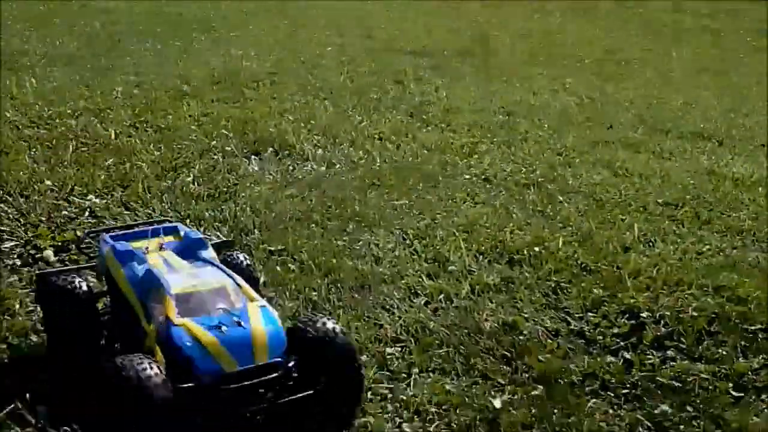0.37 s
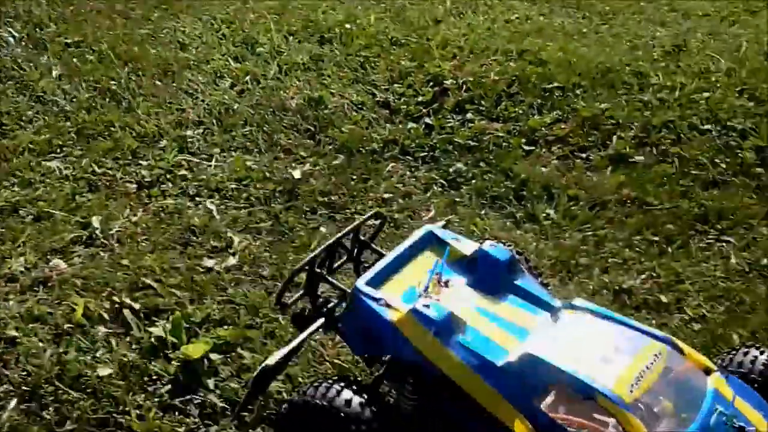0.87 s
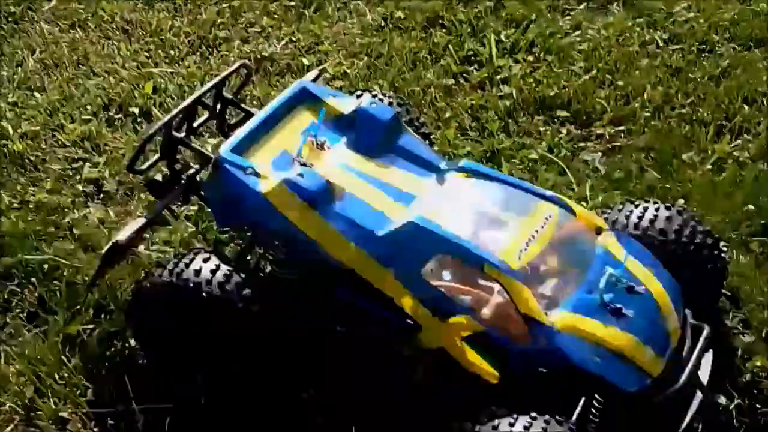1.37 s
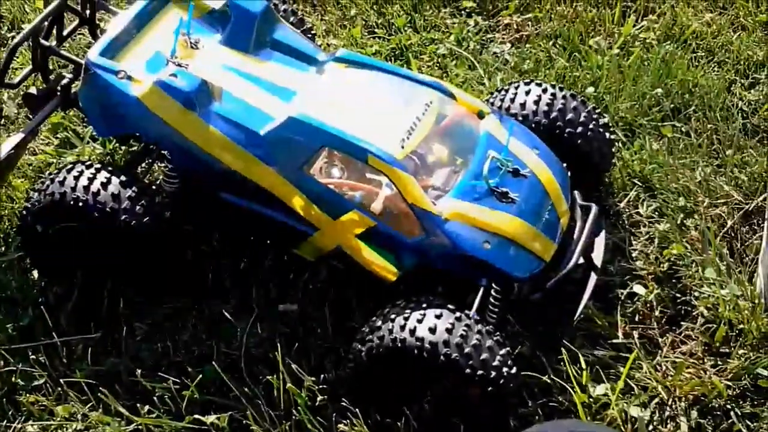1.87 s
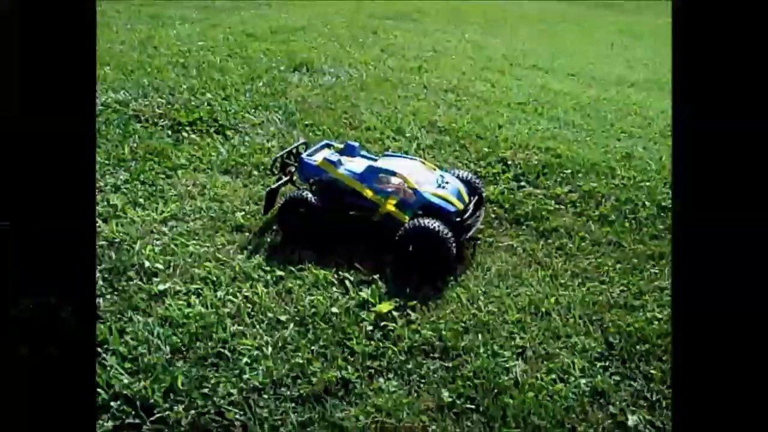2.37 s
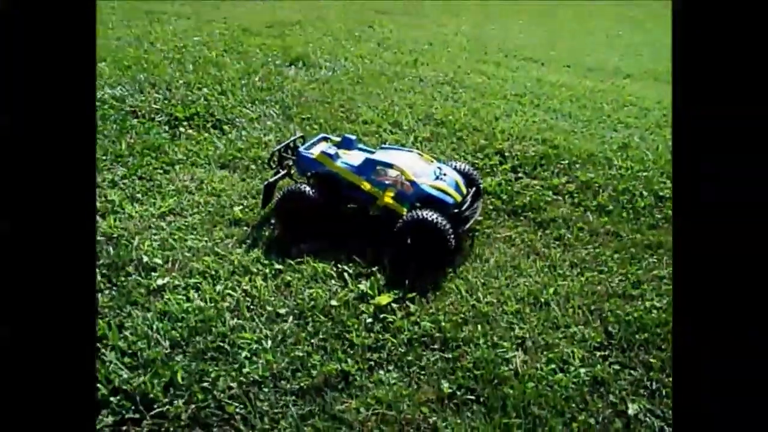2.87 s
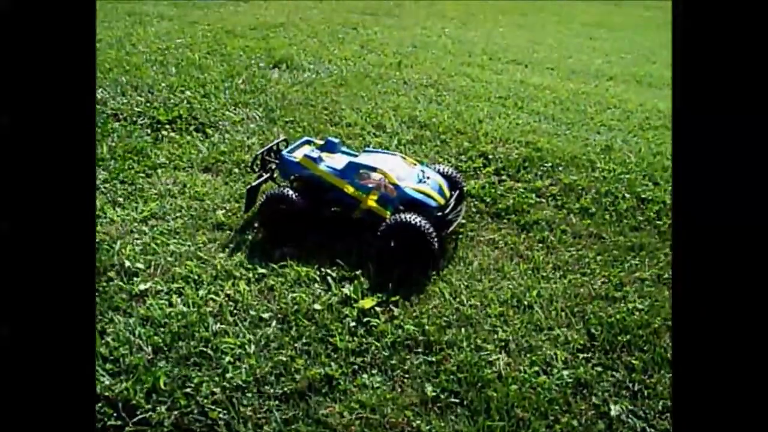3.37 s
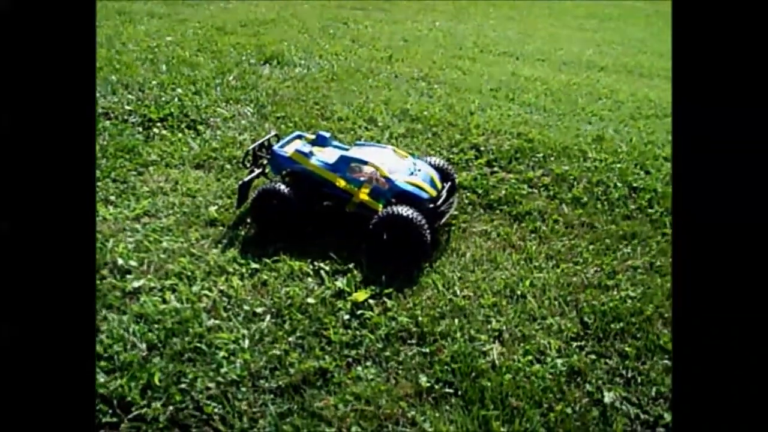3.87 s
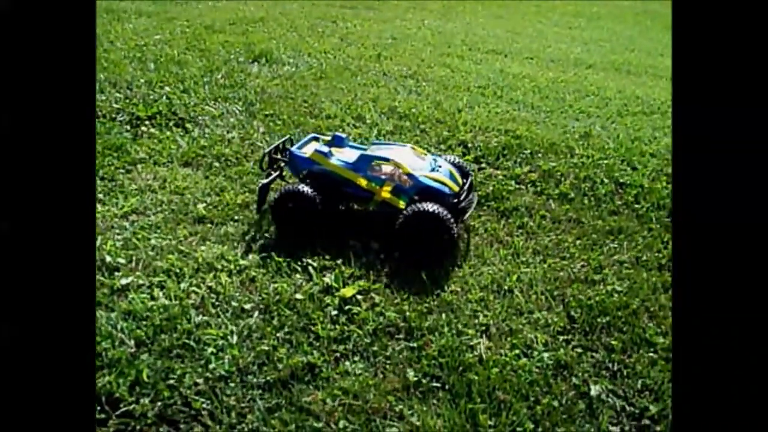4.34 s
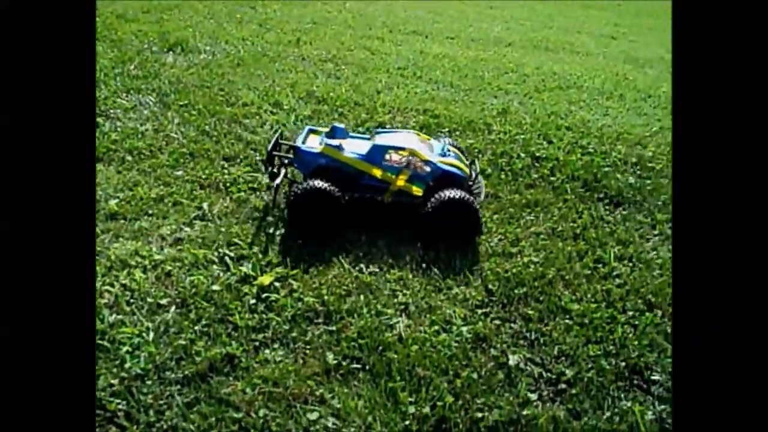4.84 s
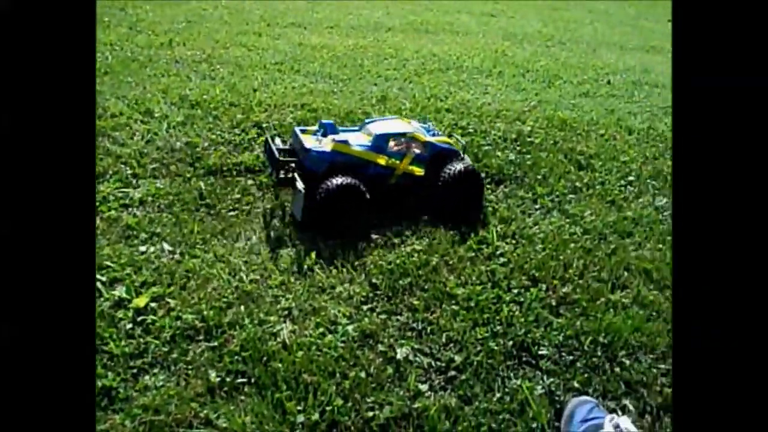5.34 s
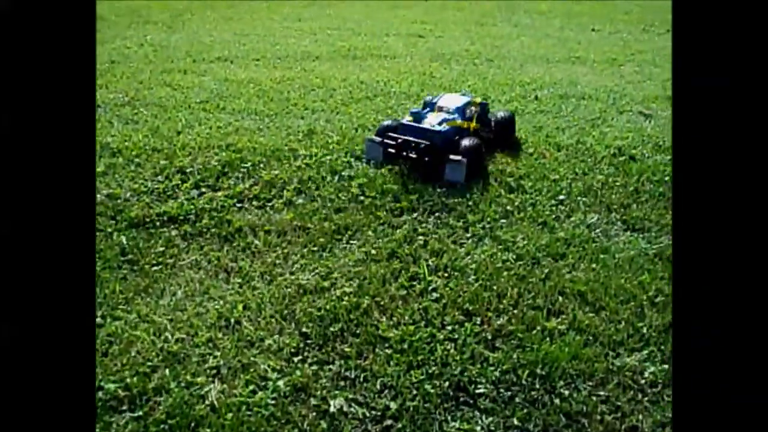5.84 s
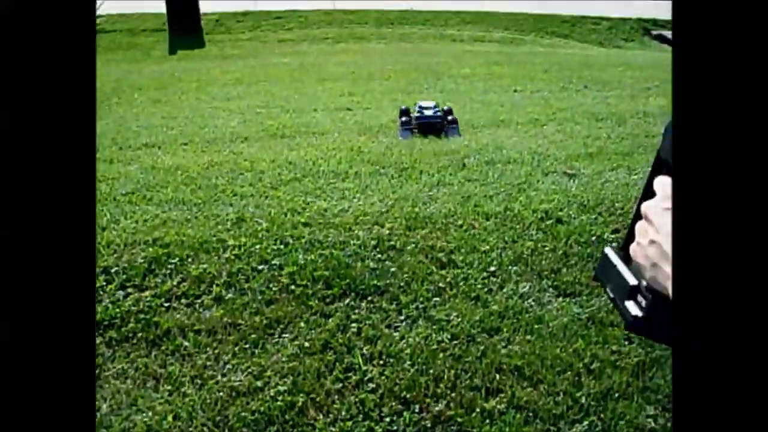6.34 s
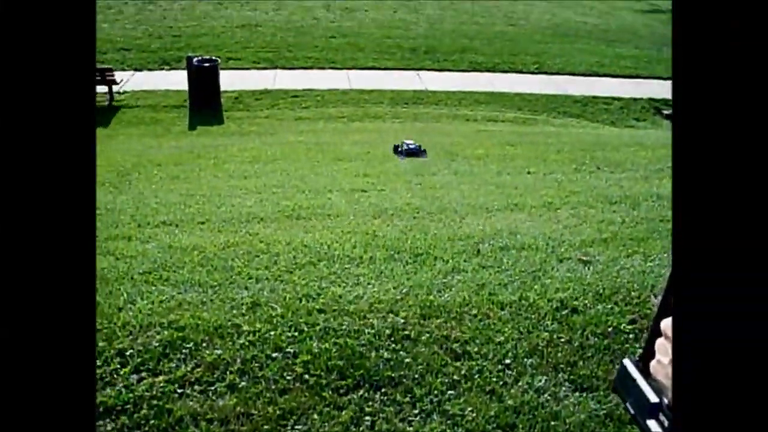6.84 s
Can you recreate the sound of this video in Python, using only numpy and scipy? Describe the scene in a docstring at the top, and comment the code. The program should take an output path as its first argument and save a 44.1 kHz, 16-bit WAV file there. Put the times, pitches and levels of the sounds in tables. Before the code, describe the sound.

Faint air and electronic hum sit under tyres brushing grass and light plastic ticking, fading as the small truck halts near the microphone. Fingers bump the camera and its button snaps. After a tiny silence, a muffled second microphone gives loud hiss and low wind. Irregular hand-held remote clicks and a short scrape come close, a bird chirps, then the electric drive growls away, rising to a harsh, clipped whine amid tyre rush.

```python
"""A radio-controlled truck swishes through grass to a stop beside a camera, its servo whirring at the start,
chassis ticking and electronics humming; then a soft push and a button click on the camera. After a cut, a
duller second camera: loud hiss, wind and a distant machine under plastic clicks of the hand-held remote and
a bird. The truck pulls away, its gear whine climbing until it overloads the input. Shaped noise makes the
air and grass, ringing puffs the clicks, and a gliding tone with smeared overtones the gears."""
import sys
import numpy as np
from scipy import signal
from scipy.io import wavfile
from scipy.ndimage import uniform_filter1d

SR = 44100
rng = np.random.default_rng(int(sys.argv[2]) if len(sys.argv) > 2 else 0)


def persist_wave(psi):
    """Save psi, clipped to +-1, as 16-bit WAV."""
    counts = np.round(np.clip(psi, -1, 1) * 32767).astype(np.int16)
    wavfile.write(sys.argv[1], SR, np.atleast_2d(counts).T)


def field_ratio(decibels):
    """Amplitude ratio for a level in dB (20 dB per decade); scalars and array-likes work."""
    return 10 ** (np.asarray(decibels, dtype=float) / 20)


N = 306936  # samples, just under 7 s
CUT_S = 2.378

# Noise colours, relative since the noise is levelled afterwards: [pitch_hz, level_db per Hz]
FLOOR_COLOUR = [(130, -15), (250, 1.5), (500, -3), (900, -3.5), (1600, -11.5), (2700, -13.5), (4500, -12.5),
                (7500, -16.5), (9500, -25.5), (15500, -43.5), (16500, -70.5)]
GRASS_COLOUR = [(200, -2), (300, -2), (600, 2), (1100, 0), (1600, 7), (2400, -2), (3100, -6.5), (4000, -2),
                (5500, -10), (7000, -8.5), (9000, -19.5), (12000, -25.5), (15500, -26), (16500, -61.5)]
HISS_COLOUR = [(120, -41.5), (200, 1.5), (296, -7.5), (326, -5.5), (445, -8.5), (584, -11), (706, -1),
               (766, -9.5), (890, -7), (1010, -5), (1370, -6.5), (1550, -3), (2180, -5.5), (2860, 1.5),
               (5120, -20), (6660, -63.5), (11300, -120)]
WIND_COLOUR = [(8.8, -29), (15, 8.5), (59, -8), (97, -7.5), (130, -11), (183, -30.5), (228, -19),
               (400, -36), (520, -67.5), (880, -120)]
BREEZE_COLOUR = [(30, -25.5), (60, -2), (120, 13), (250, -6), (400, -28.5)]

# Gusts of air, bell-shaped: [centre_s, level_db, length_s]
BREEZE_PUFFS = [(.4, -53, 0.052), (.56, -57, .04), (.73, -49, 0.066), (.93, -51, 0.071), (1.23, -65, 0.13),
                (1.89, -47, 0.082), (2.16, -52, 0.047)]
WIND_GUSTS = [(2.85, -31.5, 0.05), (3.65, -32, 0.025), (5.35, -31, 0.071), (5.52, -31, .06),
              (5.98, -31, 0.025), (6.27, -32.5, 0.031), (6.45, -33.5, 0.021), (6.8, -29.5, .08)]
# One brief rustle of grass: [centre_s, level_db, length_s]
RUSTLE = (2.28, -46.5, 0.014)
# Short whirrs of the steering servo: [centre_s, level_db, length_s]
SERVO_WHIRRS = [(0, -42, .008), (.02, -41, .009), (.047, -36, 0.011), (.092, -36, 0.0084)]

# A distant machine: [pitch_hz, rms_db, width_hz]
FAR_MACHINE = [(715, -52, 20), (95, -42, 18)]
# Idle noise bands of fan and speed controller: [pitch_hz, rms_db, width_hz]
IDLE_BANDS = [(210.7, -61.5, 6.5), (1170, -77, 78), (3590, -61, 450)]
# Steady switching tones of the electronics: [pitch_hz, rms_db]
SWITCHING_TONES = [(1200, -63.5), (3601, -65.5)]

# Resonances of the servo, chassis, remote's shell and truck body: [pitch_hz, width_hz, gain_db]
SERVO_MODES = [(1150, 180, 2), (3610, 250, -3.5), (6100, 500, -10.5)]
CHASSIS_MODES = [(1055, 130, 0), (1600, 180, -7), (1870, 150, 3), (2716, 310, -3), (3620, 570, -10.5),
                 (6030, 1300, -18)]
SHELL_MODES = [(400, 390, -7), (710, 320, -9.5), (1350, 270, 1.5), (1600, 72, 5.5), (2080, 570, 3),
               (2910, 1300, 4), (3306, 200, 4)]
BODY_MODES = [(620, 64, -20), (1027, 130, 1.5), (1830, 67, -13), (2557, 270, 15), (3140, 100, 0),
              (2970, 340, -9.5), (4160, 63, 0.5), (5640, 250, -37.5)]

# Gliding bird notes: [start_s, length_s, from_hz, to_hz, level_db]
BIRD_NOTES = [(4.733, .014, 3500, 3300, -31), (4.731, .014, 4100, 3900, -33),
              (4.754, .016, 3200, 3600, -28), (4.764, .018, 3800, 4200, -29),
              (4.777, .018, 3450, 3520, -25)]
# Finger on the camera case: [start_s, level_db, pitch_hz]
FINGER_THUMPS = [(2.066, -28.5, 490), (2.136, -27, 290), (2.153, -32, 220)]
# Trigger rubbing on the remote: [from_s, to_s, level_db]
SCRAPE = (3.925, 4.03, -24.5)

# Knocks: [start_s, peak_db, ring_hz, t60_s]
CAMERA_BUTTON = [(2.0645, -34.5, 4970, 0.01), (2.0748, -1.5, 4360, 0.0058)]
REMOTE_CLICKS = [(2.754, -6, 1350, 0.018), (2.769, -3.5, 1610, 0.014), (2.797, 8.5, 2010, 0.026),
                 (2.847, -5.5, 2183, 0.029), (2.853, 14.5, 2255, 0.036), (2.893, -7, 2680, 0.036),
                 (3.123, -11.5, 1350, 0.021), (3.131, -3, 1810, 0.045), (3.143, -12, 1600, 0.049),
                 (3.241, -7.5, 1680, 0.032), (3.256, -0.5, 1404, 0.015), (3.394, -15, 2170, 0.014),
                 (3.408, -14.5, 1620, 0.047), (3.529, -5, 2470, 0.02), (3.868, -8, 2480, 0.021),
                 (3.927, -9.5, 735, 0.039), (4.042, -7.5, 2174, 0.01), (4.063, -17, 2640, 0.016),
                 (4.087, -12, 1310, 0.032), (4.152, -19.5, 2300, 0.033), (4.198, -7.5, 2220, 0.017),
                 (4.256, 2.5, 1600, 0.046), (4.449, -2.5, 2080, 0.016), (4.492, -17.5, 1530, 0.034),
                 (4.975, -6, 2630, 0.02), (5.569, -3.5, 2150, 0.028), (5.613, -12, 2900, 0.01),
                 (5.648, -10, 2460, 0.01)]
CHASSIS_TICKS = [(0.268, -38, 970, 0.04), (0.5153, -22, 2960, 0.04), (0.568, -35, 1130, 0.027),
                 (0.619, -31, 2660, 0.16), (0.9798, -28, 2100, 0.025), (1.0638, -33, 1150, 0.11),
                 (1.0849, -31.5, 2100, 0.12), (1.1069, -33.5, 2150, 0.036), (1.1856, -35, 1200, 0.21),
                 (1.2708, -36, 1100, 0.027), (1.3065, -28, 1220, 0.021), (1.3758, -34.5, 1200, 0.04),
                 (1.3604, -38, 1900, 0.03)]  # steering and chassis plastic

# Tyres rolling in grass: [time_s, swish_db, treble_db]
ROLL = [(0, -57.5, -45.5), (.09, -45, -41.5), (.18, -50, -49.5), (.26, -41.5, -40), (.39, -49, -51.5),
        (.56, -45.5, -50), (.65, -43, -46), (.88, -43.5, -45.5), (.99, -39.5, -43), (1.04, -52.5, -50),
        (1.09, -42.5, -53), (1.17, -46.5, -49.5), (1.31, -53, -57), (1.4, -65, -78.5), (1.6, -75, -77)]
# Gears pulling away, before the body shapes them: [time_s, mesh_hz, load_db]
DRIVE = [(5.29, 191.8, -26), (5.33, 202.9, -24.5), (5.43, 248.8, -23.5), (5.49, 316.4, -22),
         (5.57, 363, -20.5), (5.63, 389.4, -23), (5.75, 538, -16.5), (5.855, 665, -21.5),
         (5.875, 720.2, -19.5), (5.96, 919, -16.5), (6.01, 967.7, -14.5), (6.05, 1154, -13),
         (6.1, 1305, -13.5), (6.18, 1336, -19), (6.21, 1470, -18.5), (6.26, 1584, -12), (6.31, 1830, -9.5),
         (6.35, 1771, -15), (6.4, 1772, -13), (6.43, 1930, -10.5), (6.47, 2480, -15), (6.5, 2579, -8.5),
         (6.6, 2483, -9.5), (6.63, 2535, -9), (6.656, 2340, -24), (6.67, 2498, -3.5), (6.71, 2658, -14),
         (6.77, 2995, -7.5), (6.82, 2997, -9), (6.865, 3080, -10.5), (6.878, 3340, -9.5),
         (6.92, 3430, -7.5), (6.96, 3544, -28)]
# Overtones of the mesh against its load, before the body: [time_s, double_db, triple_db]
OVERTONES = [(5.3, -20, -0.5), (5.45, -8, -7.5), (5.49, 1.5, -16), (5.6, -2, -10), (5.72, -4.5, -14),
             (5.85, -12, -15), (5.88, -5, 3), (5.99, -7.5, -6), (6.04, -1, -24), (6.12, -3, -4),
             (6.19, -4, -6), (6.26, 1, -18), (6.29, -11.5, -7), (6.32, -2.5, -2), (6.37, -15, -3.5),
             (6.43, -0.5, -24.5), (6.48, -22.5, -40.5), (6.66, -11.5, -41.5), (6.72, -32.5, -42)]
# Weaker gear orders, before the body: [multiple of the mesh, level_db]
WEAK_ORDERS = [(1 / 3, -31.5), (2 / 3, -33.5), (4 / 3, -35), (7 / 3, -35.5)]
# How well the body radiates a tone: [pitch_hz, gain_db]
RADIATION = [(400, -40), (500, -25.5), (620, -6.5), (760, -8.5), (870, -12), (980, 2), (1080, -4.5),
             (1200, -10), (1500, -10), (1800, -7), (2150, 1), (2600, 5.5), (3050, -0.5), (3300, -10),
             (3600, -11), (3950, -1.5), (4300, -11.5), (4800, -17.5), (5250, -14.5), (7000, -69)]
# Noise of the pull-away: [time_s, tyre and gear rush_db, gear rasp_db]
RUSH = [(5.28, -47, -54), (5.5, -31.5, -30), (5.75, -28.5, -15), (5.87, -24.5, -13), (5.96, -20, -26),
        (6.3, -17, -29), (6.47, -19, -33), (6.52, -19, -37.5), (6.64, -29, -31), (6.68, -21.5, -29),
        (6.85, -22.5, -34.5), (6.95, -18.5, -31)]
# A wheel slips free and the speed leaps: [centre_s, share of the speed added]
WHEEL_SPINS = [(6.534, .16), (6.558, .16), (6.575, .1)]


def evened(x):
    """Scales to rms 1."""
    return x / np.sqrt(np.mean(x ** 2) + 1e-20)


def curves(rows):
    """Draws each column of a table as a line over every sample."""
    s, *columns = np.transpose(rows)
    return [np.interp(np.arange(N) / SR, s, column) for column in columns]


def wander(per_s):
    """Slow random drift, rms 1."""
    lowpass = signal.butter(2, per_s, fs=SR, output="sos")
    return evened(signal.sosfiltfilt(lowpass, rng.standard_normal(N)))


def noise(colour, patchy_db):
    """Coloured noise whose level drifts in small patches of time and pitch, rms 1."""
    hz, db = np.transpose(colour)
    bins = np.fft.rfftfreq(1024, 1 / SR)
    real, imaginary, patches = rng.standard_normal((N // 256 + 5, 513, 3)).T
    patches = uniform_filter1d(patches, size=12, axis=0)
    patches = evened(uniform_filter1d(patches, size=8, axis=1))
    colour_db = np.interp(np.log(bins + 1), np.log(hz + 1), db, -120, -120)
    spectrum = (real + 1j * imaginary) * field_ratio(colour_db[:, None] + patchy_db * patches)
    return evened(signal.istft(spectrum, nperseg=1024, noverlap=768)[1][:N])


def resonate(x, hz, width):
    """One resonance of peak gain 1."""
    return signal.lfilter(*signal.iirpeak(hz, hz / width, SR), x)


def through(x, modes):
    """A body with several resonances, alternating in sign."""
    return sum((-1) ** k * field_ratio(db) * resonate(x, hz, width) for k, (hz, width, db) in enumerate(modes))


def bands(rows):
    """Narrow bands of steady noise."""
    return sum(field_ratio(db) * evened(resonate(rng.standard_normal(N), hz, width)) for hz, db, width in rows)


def gusts(rows, calm_db):
    """Gain of a calm level with bell-shaped swells on top."""
    t = np.arange(N) / SR
    return field_ratio(calm_db) + sum(field_ratio(db) * np.exp(-((t - s) / length) ** 2) for s, db, length in rows)


def knocks(rows, modes, shell, own_width):
    """Each knock is a dying puff of noise that rings its own spot and the shared shell."""
    out, t = np.zeros(N + 4000), np.arange(4000) / SR
    for (s, db, hz, t60), chance in zip(rows, rng.standard_normal((len(rows), 4000))):
        attack = np.minimum(t / 0.00055, 1)
        puff = chance * field_ratio(-60 * t / max(t60, .001)) * attack
        ring = resonate(puff, hz, own_width * hz) + shell * through(puff, modes)
        out[round(s * SR):][:4000] += field_ratio(db) * ring / abs(ring).max()
    return out[:N]


def limiter(x, ceiling, recover_db_per_s):
    """Gain drops within 2 ms on a loud peak and creeps back, ducking the background."""
    fall = np.arange(N) * recover_db_per_s / SR
    over_db = 20 * np.log10(abs(x) / ceiling + 1e-9)
    held_db = np.maximum(np.maximum.accumulate(over_db + fall) - fall, 0)
    return x / field_ratio(uniform_filter1d(held_db, size=88, origin=43))


def quiet_floor():
    """Steady, faint coloured noise under the first shot."""
    return field_ratio(-55) * noise(FLOOR_COLOUR, patchy_db=1)


def camera_hiss():
    """Loud, steady coloured noise of the second camera."""
    return field_ratio(-33) * noise(HISS_COLOUR, patchy_db=1.5)


def breeze():
    """Moving air: low noise swelling in short puffs with a restless level."""
    gain = gusts(BREEZE_PUFFS, calm_db=-65) * field_ratio(1.6 * wander(25))
    return gain * noise(BREEZE_COLOUR, patchy_db=2.0)


def wind():
    """Low wind noise, steady with gusts and then freshening."""
    steady_db, rise_s, rise_db_per_s = -31.5, 5.62, 5
    calm_db = steady_db + rise_db_per_s * np.maximum(np.arange(N) / SR - rise_s, 0)
    return gusts(WIND_GUSTS, calm_db) * field_ratio(0.33 * wander(7.3)) * noise(WIND_COLOUR, patchy_db=0.5)


def electronics():
    """Fan and speed controller idle as narrow noise bands with pure switching tones."""
    t = np.arange(N) / SR
    tones = sum(np.sqrt(2) * field_ratio(db) * np.sin(2 * np.pi * hz * t) for hz, db in SWITCHING_TONES)
    return bands(IDLE_BANDS) + tones


def bird():
    """Short gliding whistles with rounded starts and ends."""
    out = np.zeros(N)
    for s, length, from_hz, to_hz, db in BIRD_NOTES:
        hz = np.linspace(from_hz, to_hz, round(length * SR))
        whistle = np.hanning(len(hz)) * np.sin(2 * np.pi * np.cumsum(hz) / SR)
        out[round(s * SR):][:len(hz)] += field_ratio(db) * whistle
    return out


def finger_thumps():
    """Soft pushes on the case: about one rounded cycle each."""
    out = np.zeros(N)
    for s, db, hz in FINGER_THUMPS:
        cycle = np.arange(0, 1.5, hz / SR)
        push = np.hanning(len(cycle)) * np.cos(2 * np.pi * (cycle - .75))
        out[round(s * SR):][:len(cycle)] += field_ratio(db) * push
    return out


def camera_button():
    """A button snaps as two very short, broad knocks."""
    return knocks(CAMERA_BUTTON, CHASSIS_MODES, shell=0.33, own_width=0.87)


def trigger_scrape():
    """Stick-slip of plastic on plastic: random impulses ring the remote's shell."""
    t = np.arange(N) / SR
    from_s, to_s, level_db = SCRAPE
    slips = rng.standard_normal(N) * (rng.random(N) < 2500 / SR)  # about 2500 a second
    fade = np.clip(np.minimum(t - from_s, to_s - t) / .008, 0, 1)
    ringing = evened(through(slips, SHELL_MODES) + 2.7 * resonate(slips, hz=740, width=200))
    return field_ratio(level_db + 2.5 * wander(60)) * fade * ringing


def remote_clicks():
    """Plastic clicks of the remote, each ringing its own pitch and the shell."""
    return knocks(REMOTE_CLICKS, SHELL_MODES, shell=0.24, own_width=0.085)


def steering_servo():
    """The servo whirrs in short swells of resonant noise."""
    whirr = evened(through(rng.standard_normal(N), SERVO_MODES))
    return gusts(SERVO_WHIRRS, calm_db=-120) * whirr


def chassis_ticks():
    """Plastic ticks ring their own spot and the chassis."""
    return knocks(CHASSIS_TICKS, CHASSIS_MODES, shell=0.36, own_width=0.1)


def chassis_rattle():
    """Small random taps, about 100 a second, ring the chassis; rms 1."""
    taps = rng.uniform(-1, 1, N) * (rng.random(N) < 100 / SR)
    puff = rng.standard_normal(600) * field_ratio(-60 * np.arange(600) / SR / .03)  # t60 30 ms
    return evened(through(signal.oaconvolve(taps, puff)[:N], CHASSIS_MODES))


def grass():
    """Tyres brush the blades: fluttering noise in three bands, with rattle and a brief rustle."""
    blades = noise(GRASS_COLOUR, patchy_db=1) * field_ratio(2.5 * wander(300))  # fast flutter roughens it
    blades = blades + 0.17 * evened(through(blades, CHASSIS_MODES))  # the chassis colours the swish

    def band(edge_hz, kind):
        return evened(signal.sosfilt(signal.butter(2, edge_hz, kind, fs=SR, output="sos"), blades))

    low, middle, high = band(2100, "low"), band((2100, 4300), "band"), band(4300, "high")
    swish_db, treble_db = curves(ROLL)
    middle_gain = field_ratio(-4 + 1 * wander(6.1))
    rolling = field_ratio(swish_db) * (low + middle_gain * middle + field_ratio(-8) * chassis_rattle())
    rustle = gusts([RUSTLE], calm_db=-120) * high
    return rolling + field_ratio(treble_db) * high + rustle


def gear_mesh(hz, load_db, turns):
    """Meshing teeth sing a tone and two overtones, loud where they cross a body resonance."""
    speed = np.clip(hz / 900, .55, 1)  # slow gears run smoother
    tone = 0
    smears = [(70, .42), (120, .7), (160, .85)]  # uneven teeth smear the higher orders most: rate, depth
    for k, (order_db, (per_s, depth)) in enumerate(zip([0, *curves(OVERTONES)], smears), start=1):
        radiated_db = np.interp(k * hz, *np.transpose(RADIATION))
        line_db = load_db + order_db + 3.47 * wander(16.5) + radiated_db
        shake = 1 + depth * speed * (wander(per_s) + 1j * wander(per_s))
        tone = tone + field_ratio(line_db) * (shake * np.exp(2j * np.pi * k * turns)).real
    return 1.425 * tone


def weak_orders(hz, rush_db, turns):
    """Fractional gear orders ring the body, swelling with speed and rush."""
    orders = sum(field_ratio(db + 6.34 * wander(22)) * np.sin(2 * np.pi * k * turns) for k, db in WEAK_ORDERS)
    swell = np.clip(hz / 2400, 0, 1) * field_ratio(0.096 * (rush_db + 33.0))
    return through(orders, BODY_MODES) * swell


def gear_rasp(rasp_db):
    """Rough tooth noise through two modes of the body."""
    teeth = rng.standard_normal(N) * field_ratio(2.5 * wander(120))
    modes = resonate(teeth, hz=2520, width=260) - resonate(teeth, hz=2850, width=220)
    return field_ratio(rasp_db) * evened(modes)


def motor():
    """The drive pulls away: climbing gear tones over the rush of gears and tyres in the plastic body."""
    (hz, load_db), (rush_db, rasp_db) = curves(DRIVE), curves(RUSH)
    t = np.arange(N) / SR
    start = np.clip((t - DRIVE[0][0]) / 0.036, 0, 1)
    spin = sum(share * np.exp(-((t - s) / 0.0047) ** 2) for s, share in WHEEL_SPINS)
    turns = np.cumsum(hz * (1 + spin + .016 * wander(50))) / SR  # the load flutters the speed
    gears = gear_mesh(hz, load_db, turns) + weak_orders(hz, rush_db, turns) + gear_rasp(rasp_db)
    rush = evened(through(rng.standard_normal(N), BODY_MODES)) * field_ratio(rush_db + 2.0 * wander(50))
    tyres = field_ratio(rush_db - 11.5) * noise(HISS_COLOUR, patchy_db=2.0)  # broad tyre hiss
    return start * (gears + rush + tyres)


def first_shot():
    """The truck rolls to a stop and a button is pressed, all behind a slow limiter."""
    background = quiet_floor() + breeze() + electronics()
    handling = finger_thumps() + camera_button()
    truck = steering_servo() + chassis_ticks() + grass()
    return limiter(background + handling + truck, ceiling=0.39, recover_db_per_s=28)


def second_shot():
    """Remote, bird and pull-away behind this camera's limiter, clipping and narrow band."""
    background = camera_hiss() + wind() + bands(FAR_MACHINE) + bird()
    remote = trigger_scrape() + remote_clicks()
    limited = limiter(background + remote + motor(), ceiling=0.92, recover_db_per_s=202.5)
    loud = np.clip(limited, -1.1, 1.1)
    return signal.sosfilt(signal.ellip(9, .5, 90, 5220, fs=SR, output="sos"), loud)  # steep edge, Hz


def scene():
    """Two shots joined by a cut with a few silent milliseconds."""
    t = np.arange(N) / SR
    fade_out = np.clip((CUT_S - .008 - t) / .004, 0, 1)
    second = second_shot() - .024  # the second input sits off centre
    return (fade_out * first_shot() + (t > CUT_S) * second)[None]


def low_pass(x):
    """Removes everything above the highest recorded frequency."""
    return signal.sosfilt(signal.butter(12, 16000, fs=SR, output="sos"), x)


def record(dry):
    """Hard overload flattens the peaks of the input."""
    mix = np.clip(dry, -.99, .99)
    return low_pass(mix)


dry = scene()
out = record(dry)
persist_wave(out)
```